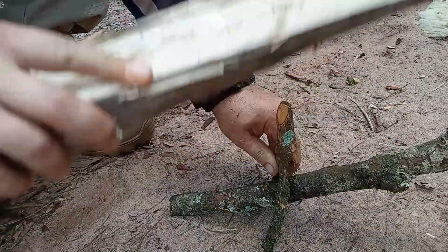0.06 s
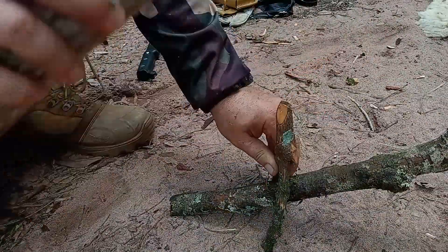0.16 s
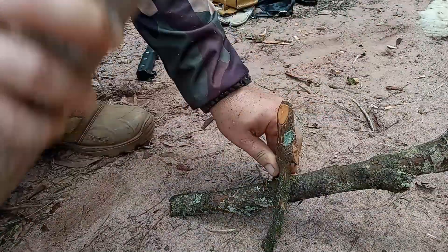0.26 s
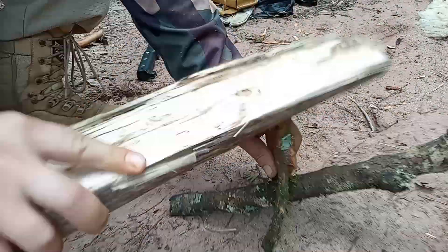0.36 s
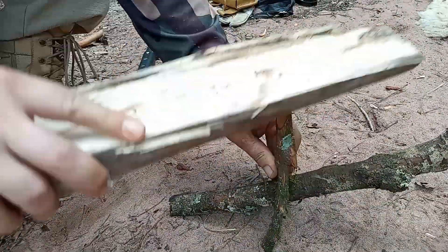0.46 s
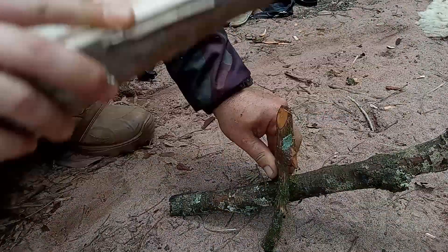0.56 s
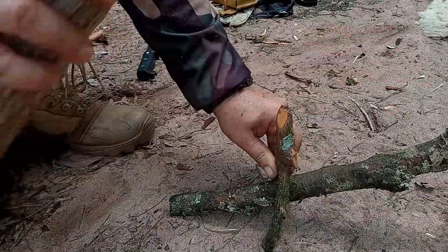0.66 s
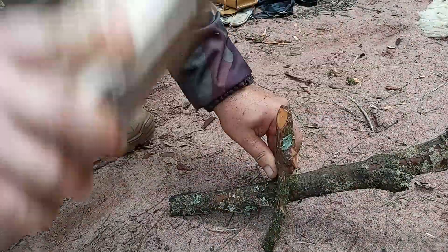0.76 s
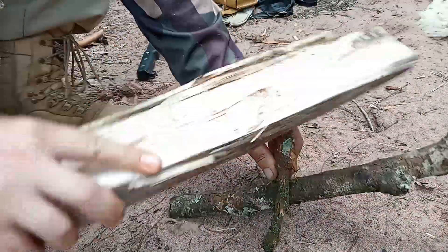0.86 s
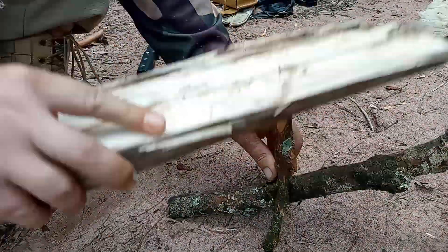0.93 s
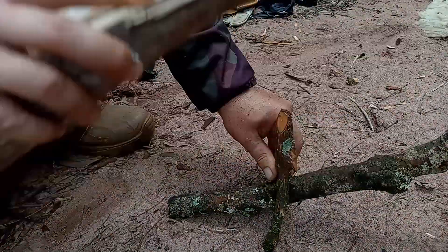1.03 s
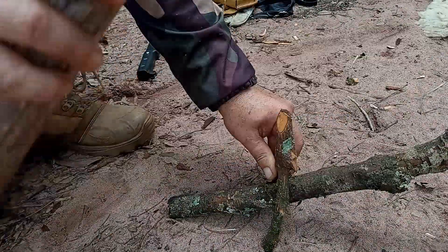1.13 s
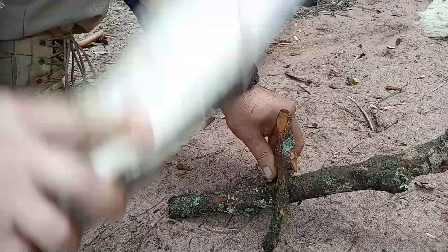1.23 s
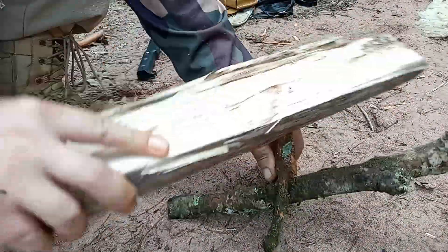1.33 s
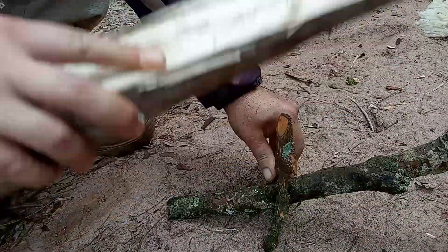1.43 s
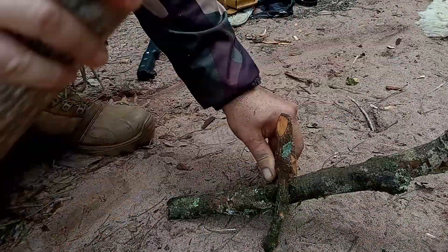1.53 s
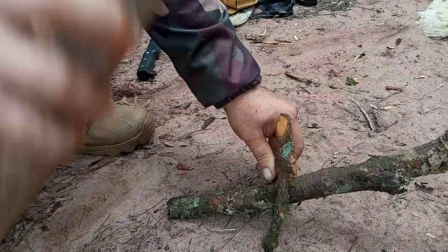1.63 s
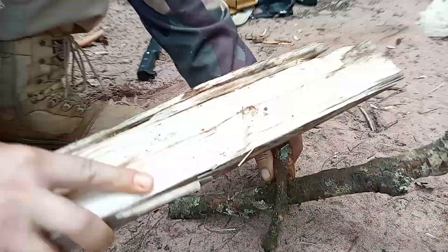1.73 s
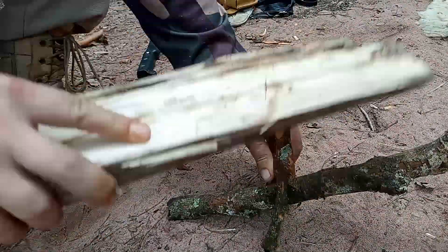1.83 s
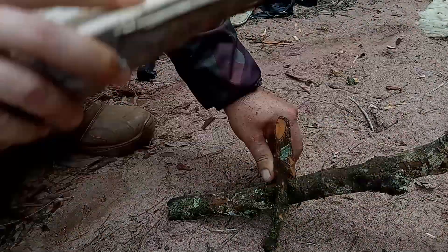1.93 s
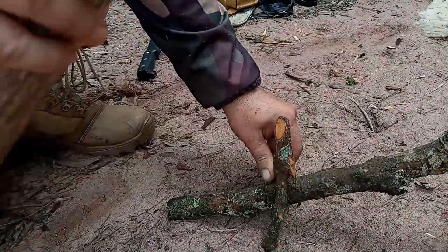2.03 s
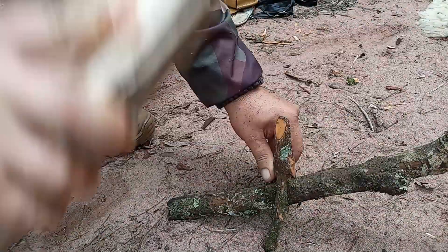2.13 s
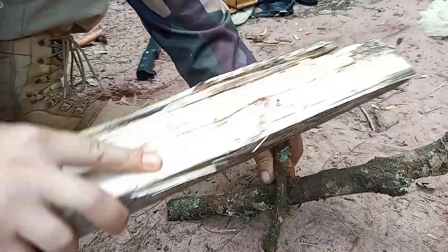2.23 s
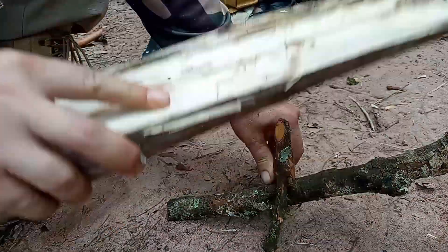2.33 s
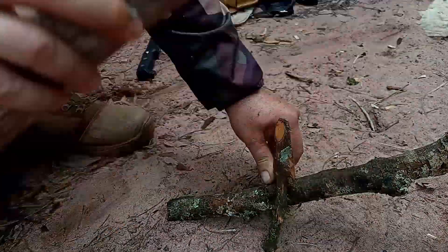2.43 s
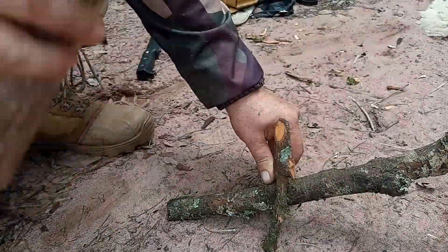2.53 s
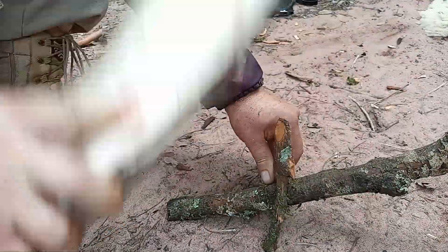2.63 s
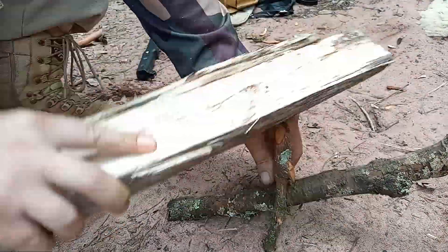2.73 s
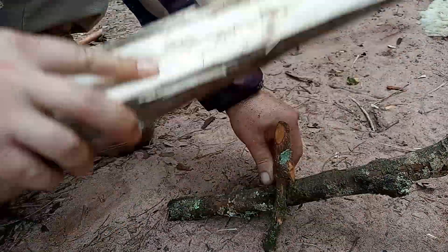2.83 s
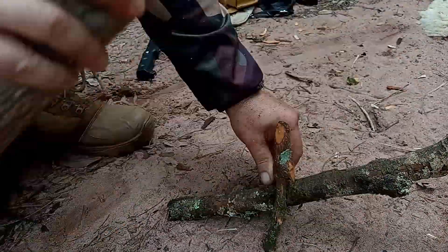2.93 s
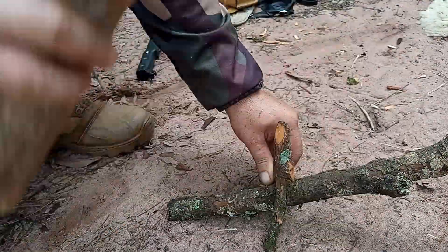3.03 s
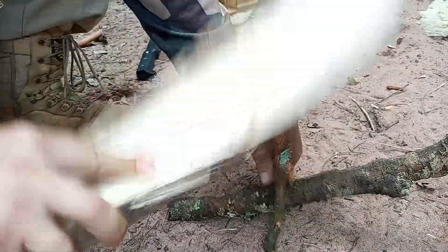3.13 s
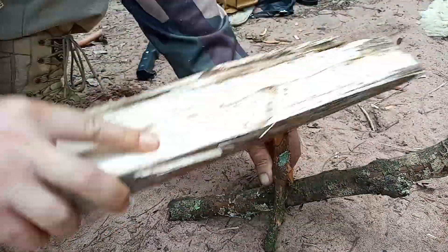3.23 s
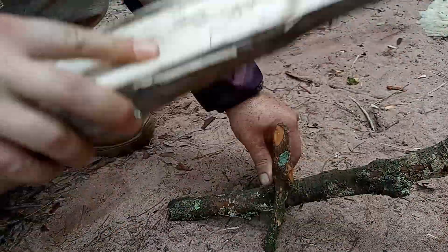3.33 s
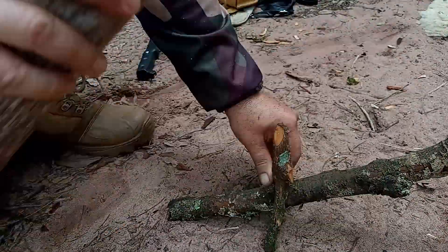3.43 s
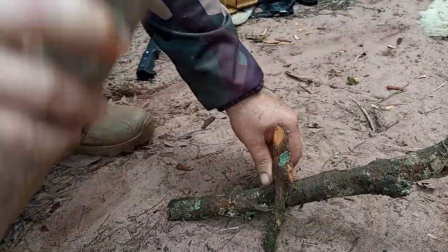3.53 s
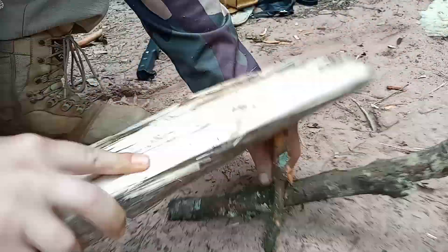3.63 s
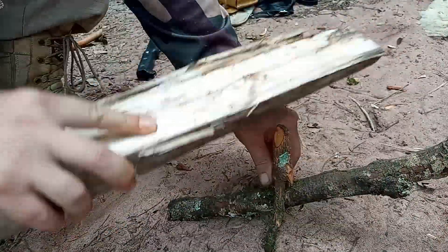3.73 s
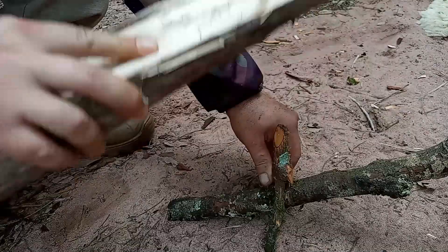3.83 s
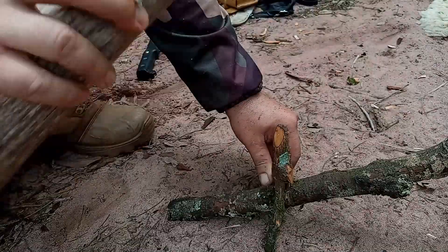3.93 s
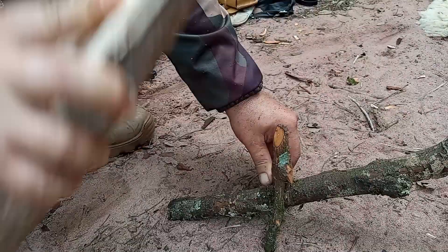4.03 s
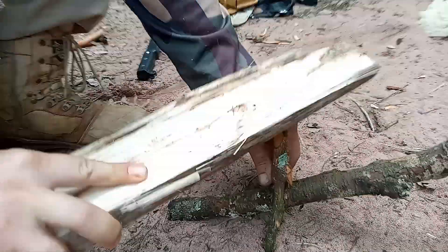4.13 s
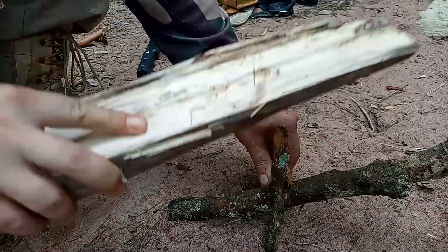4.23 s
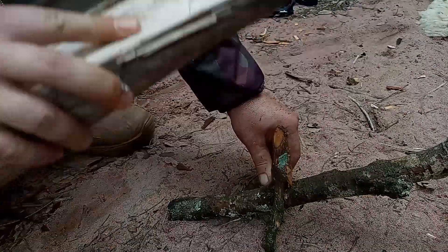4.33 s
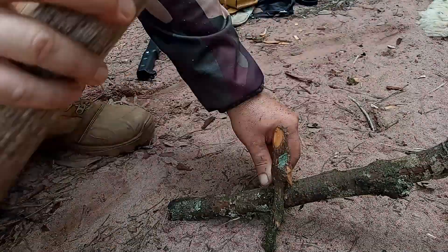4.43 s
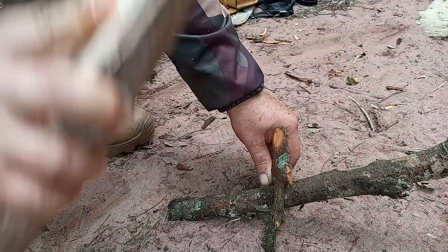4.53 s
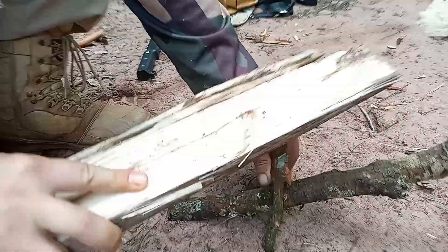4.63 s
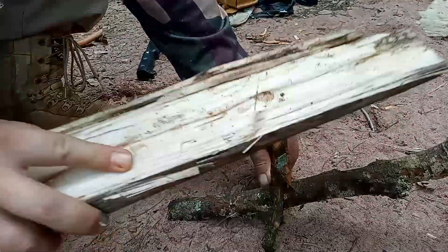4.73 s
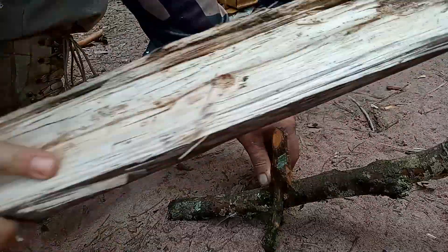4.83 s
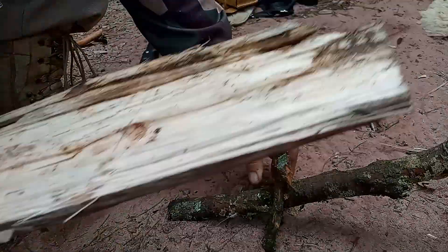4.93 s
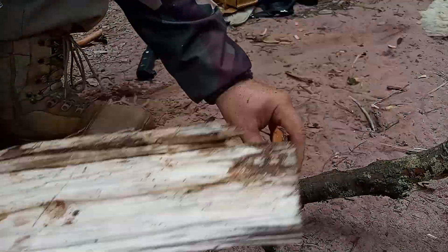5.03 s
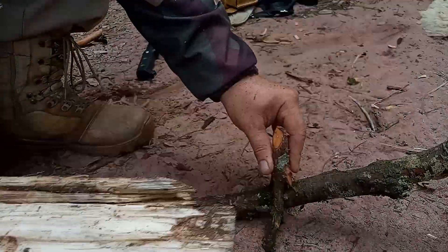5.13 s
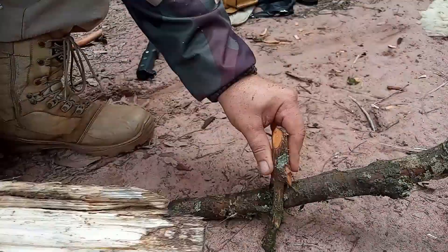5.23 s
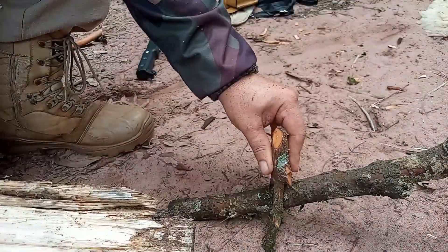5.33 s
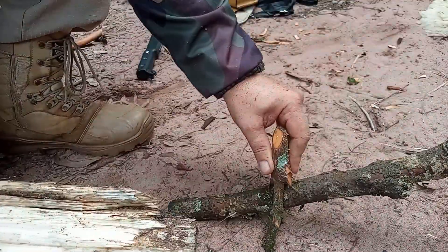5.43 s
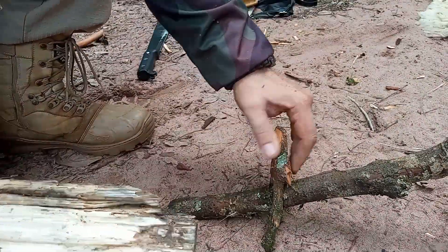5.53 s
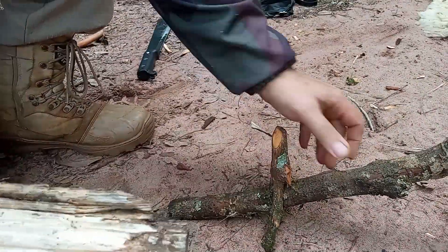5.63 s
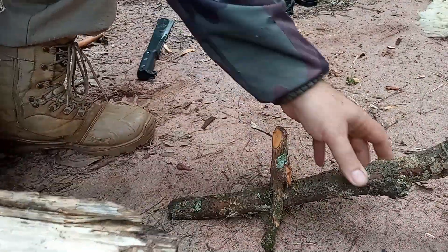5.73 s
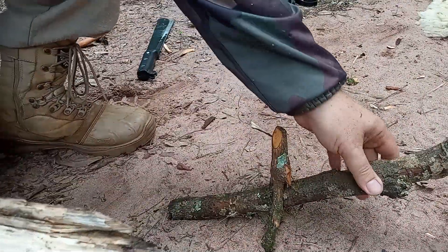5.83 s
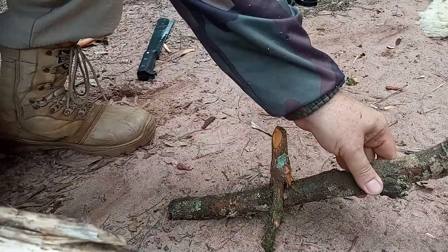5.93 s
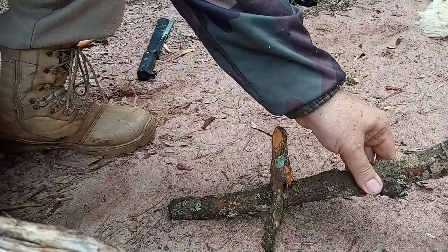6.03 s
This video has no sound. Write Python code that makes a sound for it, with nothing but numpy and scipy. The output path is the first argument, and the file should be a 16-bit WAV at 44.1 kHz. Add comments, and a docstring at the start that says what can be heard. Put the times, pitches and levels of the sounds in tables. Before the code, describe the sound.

Ten close, steady wood-on-wood knocks drive a stake into soil in quiet woods, followed by soft handling noises.

```python
"""Driving a stake in the woods

A split log knocks a thin wooden stake into sandy ground, ten blows close to a pair of microphones.
Each blow rings the log and the stake, thuds into the soil and throws up sand that rains back down.
The log clicks on the stake, sleeves rustle, grit ticks. Behind lie the hush of the woods, the faint wing
drone of an insect and the microphones' own hiss. The recorder's gain control ducks the loud moments."""
import sys
import numpy as np
from scipy import signal
from scipy.fft import rfft, irfft, next_fast_len
from scipy.io import wavfile
from scipy.ndimage import uniform_filter1d, minimum_filter1d, map_coordinates

SR = 44100
rng = np.random.default_rng(int(sys.argv[2]) if len(sys.argv) > 2 else 0)


def log_audio(samples):
    """Write samples as a 16-bit WAV file to the path given in sys.argv[1]."""
    # one column per channel
    frames = np.atleast_2d(samples).T
    # limit to full scale, then quantise
    limited = np.clip(frames, -1, 1)
    pcm = np.round(limited * 32767).astype(np.int16)
    wavfile.write(sys.argv[1], SR, pcm)


N = 267687
LEFT_LAG_S = .00096  # the stake stands nearer the right microphone


def amp(db):
    """Decibels to gain."""
    return 10 ** (np.asarray(db) / 20)


def unit(x):
    """x scaled to rms 1."""
    return x / np.sqrt(np.mean(x ** 2) + 1e-20)


def along(points, hz, column=1):
    """One column of (Hz, value, ..) rows, interpolated on a log frequency axis."""
    rows = np.array(points)
    return np.interp(np.log(hz + 1), np.log(rows[:, 0] + 1), rows[:, column])


def wobble(rate):
    """A smooth random curve with `rate` knots a second."""
    return map_coordinates(rng.standard_normal(int(N * rate / SR) + 4), [np.arange(N) * rate / SR])


def filtered(x, response):
    """x through a gain given as a function of frequency."""
    n = x.shape[-1]
    padded = next_fast_len(n + 2048)
    return irfft(rfft(x, padded) * response(np.fft.rfftfreq(padded, 1 / SR)), padded)[..., :n]


def band(hz, centre_hz, octaves):
    """Bell-shaped gain on a log frequency axis."""
    return np.exp(-.5 * (np.log2((hz + 1) / centre_hz) / octaves) ** 2)


def swell(peak_s, rise_s, fall_s):
    """Rises as a bell to its peak, then fades exponentially."""
    t = np.arange(N) / SR - peak_s
    return np.where(t < 0, np.exp(-(t / rise_s) ** 2), np.exp(-np.abs(t) / fall_s))


def ring(modes, t, pitch, spread=.0091):
    """Dying sines; grip and point of contact shift each one a little from strike to strike."""
    return sum(amp(db + rng.normal(0, 2) - 60 * t / t60)
               * np.sin(2 * np.pi * hz * pitch * rng.normal(1, spread) * t) for hz, db, t60 in modes)


def place(out, sound, start_s, pan_db):
    """Adds a near sound, right microphone first; pan_db is left over right."""
    for channel, (side, lag_s) in enumerate([(.5, LEFT_LAG_S), (-.5, 0)]):
        at = round((start_s + lag_s) * SR)
        arriving = sound[channel] if sound.ndim == 2 else sound
        out[channel, at:at + len(arriving)] += amp(side * pan_db) * arriving


def at_both_mics(sound, left_db, right_db):
    """One continuous sound at both microphones, a little later on the left."""
    return np.array([amp(left_db) * np.roll(sound, round(LEFT_LAG_S * SR)), amp(right_db) * sound])


# Treble colour of the microphone ports. Each row: frequency in Hz, gain in dB.
PORT_COLOUR = [(1760, -38), (3000, -13.5), (3270, -17), (3780, -10), (4160, -9.5), (6570, 2), (8910, -7.5),
               (10400, -3), (13400, -16.5), (15100, -7.5), (16000, -8.5), (17000, -32)]
def port_gain(hz):
    """The peaks and dips that the ports put on the treble."""
    return amp(along(PORT_COLOUR, hz))


# How hush, hiss and rustle lean across the pair. Each row: frequency in Hz, left over right in dB.
NOISE_BALANCE = [(60, -1), (99, 1.5), (160, 7.5), (270, -2), (450, -2.5), (740, 2), (1220, 4), (2010, 5.5),
                 (3330, 5), (5500, 6), (9080, 3.5), (15000, -12.5)]
def balance(hz, points=NOISE_BALANCE):
    """Gains of the left and right microphone at each frequency."""
    return amp(np.outer([.5, -.5], along(points, hz)))


def noise_bed(spectrum, db, waver_db, waver_hz):
    """Nearly steady noise, unrelated in the two channels."""
    gain = amp(db + waver_db * wobble(waver_hz))
    noise = rng.standard_normal((2, N))
    return gain * unit(filtered(noise, lambda hz: amp(along(spectrum, hz)) * balance(hz) * (hz < 16000)))


# Steady high hiss of the microphones. Each row: frequency in Hz, relative noise density in dB.
MIC_HISS_SPECTRUM = [(3240, -42), (5500, -15), (6040, -15), (6770, -7.5), (8210, -5), (9290, -23),
                     (10600, -2.5), (12400, -24), (15100, -12.5), (17000, -38.5)]
def mic_hiss():
    """The microphones' self-noise."""
    return noise_bed(MIC_HISS_SPECTRUM, db=-67.5, waver_db=.4, waver_hz=1.6)


# The woods all around. Each row: frequency in Hz, relative noise density in dB.
HUSH_SPECTRUM = [(24, 21), (45, 8), (90, -3.5), (173, -5.5), (261, -1), (355, -9.5), (402, -5.5),
                 (607, -4.5), (879, -9.5), (1470, -6.5), (5500, -15), (7150, -47.5), (12100, -120)]
def woods():
    """A low, even hush."""
    return noise_bed(HUSH_SPECTRUM, db=-63.5, waver_db=.55, waver_hz=1)


# An insect in the background. Each row: multiple of the wing beat, relative level in dB,
# group (0 low, 1 high).
WING_HARMONICS = [(1, -12, 0), (2, -4, 0), (3, 0, 0), (7, -11, 1), (8, -6, 1), (9, -1.5, 1), (10, -9, 1)]
# Its drone comes and goes. Each row: time in seconds, levels of the low and the high group in dB.
DRONE_LEVELS = [(0, -67, -62.5), (.12, -78, -83.5), (.45, -79, -89), (.58, -75, -83.5), (.72, -69.5, -68),
                (.95, -72, -94), (1.1, -81, -87.5), (1.37, -79.5, -67.5), (1.48, -81.5, -79.5),
                (1.6, -76.5, -69), (1.85, -84, -76), (2.2, -84.5, -90), (2.5, -80.5, -90),
                (3.3, -85.5, -88.5), (3.7, -91.5, -90), (4.0, -83.5, -87.5), (4.5, -88, -96.5),
                (4.88, -79, -81), (5.2, -82, -101), (6.07, -85, -96)]
def insect(wing_hz=200.9):
    """Harmonics of the wing beat; the low ones waver, the high ones flutter into a blur."""
    times, *groups = np.transpose(DRONE_LEVELS)
    group_db = [np.interp(np.arange(N) / SR, times, levels) for levels in groups]
    phase = 2 * np.pi * np.cumsum(wing_hz * (1 + .016 * wobble(32))) / SR
    drone = np.zeros(N)
    for multiple, db, group in WING_HARMONICS:
        flutter = unit(wobble(170 if group else 22))
        drone += amp(db + group_db[group]) * flutter * np.sin(multiple * phase)
    return at_both_mics(drone, left_db=9.5, right_db=1.5)


# Soft bumps in the soil nearby. Each row: peak time in seconds, level in dB.
SOIL_BUMPS = [(0.2, -66.5), (0.84, -39), (1.64, -54), (5.96, -72.5)]
def soil_rumble(fade_s=.11):
    """Low noise from the ground, after each blow and at each soft bump."""
    t = np.arange(N) / SR
    after_blows = sum(amp(db + thud_db - 24) * np.exp(-((t - s) / fade_s) ** 2) * (t > s + .02)
                      for s, db, thud_db, *_ in LOG_BLOWS)
    bumps = sum(amp(db) * swell(s, rise_s=.012, fall_s=.024) for s, db in SOIL_BUMPS)
    colour = lambda hz: band(hz, 130, .34) + .44 * band(hz, 70, .5) + .23 * band(hz, 350, .61)
    soil = unit(filtered(rng.standard_normal(N), colour))
    return (after_blows + bumps) * at_both_mics(soil, left_db=4.5, right_db=.9)


# Sleeves brushing near the microphones. Each row: peak time in seconds, levels of rasp, hiss and
# swish in dB, time to rise and to fall in seconds.
SLEEVE_BRUSHES = [(0.01, -61.5, -65, -60.5, 0.066), (0.1, -61.5, -68.5, -79, .03),
                  (0.201, -64.5, -66.5, -90, .04), (0.59, -70, -66, -74, .04), (0.72, -63, -66, -65, .03),
                  (1.144, -71.5, -62.5, -73, 0.04), (1.402, -71.5, -74.5, -79.5, 0.033),
                  (1.595, -62.5, -60, -70, 0.036), (1.655, -67, -72.5, -52.5, .012),
                  (1.938, -58.5, -62.5, -81, .03), (2.337, -69, -72.5, -92, .04),
                  (2.814, -63, -69.5, -82.5, 0.018), (2.972, -69.5, -69.5, -74, 0.018),
                  (3.288, -72, -64, -91, 0.027), (3.775, -72.5, -73, -84, .03),
                  (3.863, -77, -67.5, -93.5, 0.026), (4.286, -67.5, -74, -88, .04),
                  (4.362, -70, -66, -90, 0.022), (5.076, -70.5, -74.5, -86, .05),
                  (5.182, -63, -64, -74, 0.019), (5.428, -82.5, -61, -84, .012),
                  (5.678, -65.5, -66.5, -74, .04), (5.749, -73, -69, -84, .04),
                  (5.854, -80.5, -64, -86, .012)]
def rustle_gains():
    """Gains of rasp, hiss and swish as sleeves brush and thrown sand rains down after each blow."""
    t = np.arange(N) / SR
    sand = sum(amp(sand_db) * (t > s) * swell(s + .09, rise_s=.15, fall_s=.05)
               for s, *_, sand_db in LOG_BLOWS)
    cloth = sum(amp(levels_db)[:, None] * swell(s, half_s, half_s)
                for s, *levels_db, half_s in SLEEVE_BRUSHES)
    return cloth + amp([[0], [-3], [-5]]) * sand  # sand is mostly rasp


def rustle():
    """Cloth and sand: three bands of noise broken into grains of uneven size."""
    rasp_gain, hiss_gain, swish_gain = rustle_gains()
    grains = unit(amp(.5 * wobble(300) + .67 * wobble(45)))
    def layer(colour):
        return unit(filtered(grains * rng.standard_normal((2, N)), lambda hz: colour(hz) * balance(hz)))
    rasp = layer(lambda hz: port_gain(hz) * band(hz, 6100, 1))
    hiss = layer(lambda hz: port_gain(hz) * (hz > 9000) * (hz < 16000))
    swish = layer(lambda hz: band(hz, 1600, 1))
    return rasp_gain * rasp + hiss_gain * hiss + swish_gain * swish


def fine_grit(count=140):
    """Rows for clicks(): small grains that fall more often and louder while cloth and sand move."""
    rasp_gain, hiss_gain, _ = rustle_gains()
    activity = rasp_gain + hiss_gain + amp(-68.5)
    when, size, side, pitch = rng.random((count, 4)).T
    at = np.minimum(np.searchsorted(np.cumsum(activity), when * activity.sum()), N - 1)
    activity_db = 20 * np.log10(activity[at] / np.median(activity))
    level_db = -56 + .6 * activity_db + 9 * size ** 2
    return zip(at / SR + .001, level_db, 24 * (side - .5), 6000 * 2.6 ** pitch)


# Sharp close clicks: the log tapping or rebounding on the stake, and ticks of grit. Each row: start in
# seconds, level in dB, left over right in dB, centre frequency in Hz.
CLOSE_CLICKS = [(0.0578, -31.5, 22, 15300), (0.0288, -42.5, 4, 7300), (0.0974, -41, 5, 9000),
                (0.1324, -27.5, -11, 9650), (0.3022, -43, 4, 6700), (0.3243, -4.5, 11, 7530),
                (0.3262, -9.5, 4.5, 12700), (0.379, -27.5, 1, 5700), (0.405, -30, -8, 15200),
                (0.421, -35, -3, 5700), (0.438, -37, 4, 7210), (0.4574, -38, 2, 7800),
                (0.566, -38, -10, 10200), (0.7292, -24, 14.5, 7100), (0.7797, -4.5, 7.5, 7800),
                (0.8647, -31, 4, 6160), (0.8856, -33, -10, 14500), (0.9216, -46, -4, 10100),
                (0.9307, -33.5, -9, 15500), (0.998, -47, 10, 7490), (1.1545, -42, -6, 10500),
                (1.262, -40.5, 3, 6700), (1.3056, -28, -5, 15300), (1.3104, -23.5, 5, 5940),
                (1.3347, -33.5, 1, 14500), (1.36, -42, -7, 15500), (1.558, -45.5, 3, 7900),
                (1.59, -46.5, 6, 7600), (1.712, -43, 5, 6430), (1.7512, -22.5, -1, 5900),
                (1.812, -47, -10, 15600), (1.8392, -43.5, 7, 8250), (1.859, -42.5, -4, 10500),
                (1.922, -20.5, 14, 6300), (1.9482, -37.5, 17, 7140), (2.217, -40, -10, 11230),
                (2.5947, -20, 0.5, 3400), (2.5962, -14.5, 4, 2900), (2.6914, -35, 4, 7200),
                (2.7142, -35, -2, 7740), (2.8145, -45, 23.5, 7700), (2.966, -34.5, -16, 15400),
                (3.2844, -50, -10.5, 15430), (3.6638, -13.5, -4, 15400), (3.717, -47, -7, 10500),
                (3.851, -47, 0, 10500), (4.166, -44, -7, 12500), (4.2687, -47, 13.5, 6025),
                (4.351, -48, -21, 10640), (4.667, -35.5, -1.5, 7660), (4.6787, -28.5, -3, 14450),
                (4.8063, -44.5, 15, 7650), (4.8763, -43.5, 9, 7800), (5.02, -49, 9.5, 5800),
                (5.068, -52, 8, 7200), (5.0868, -48, 8, 6670), (5.1718, -16.5, 13.5, 15040),
                (5.414, -43.5, -5, 10700), (5.657, -37.5, -3, 5880), (5.7187, -44, -7, 15400),
                (5.8526, -51, -16, 10400), (5.866, -50, -11, 15000), (5.8855, -49, -9, 10120)]
def clicks(t60_s=.0083, wash_t60_s=.029):
    """Each brief contact gives a burst of noise around its own pitch, with a faint wash after it."""
    out, t = np.zeros((2, N + SR)), np.arange(SR // 10) / SR
    envelope = (1 - np.exp(-t / .0003)) * (amp(-60 * t / t60_s) + amp(-20 - 60 * t / wash_t60_s))
    for start_s, db, pan_db, centre_hz in [*CLOSE_CLICKS, *fine_grit()]:
        octaves = .11 * max(7000 / centre_hz, 1) ** 2.6  # lower clicks sound broader
        def colour(hz):
            peak = band(hz, centre_hz, octaves) + .53 * band(hz, centre_hz, .99)
            return peak * port_gain(np.maximum(hz, 3500)) ** .4
        burst = unit(filtered(rng.standard_normal(len(t)), colour))
        place(out, amp(db - 1) * envelope * burst, start_s - .0004, pan_db)
    return out[:, :N]


# A dry twig. Each row: frequency in Hz, relative level in dB, time to fall 60 dB in seconds.
TWIG_MODES = [(2270, 0, 0.028), (3280, -12, 0.014)]
# Its faint snaps nearby. Each row: start in seconds, level in dB, left over right in dB.
TWIG_SNAPS = [(5.655, -58, 1), (5.6699, -63, 4)]
def twig():
    """A dry twig rings briefly each time it snaps."""
    out, t = np.zeros((2, N + SR)), np.arange(SR // 10) / SR
    for start_s, db, pan_db in TWIG_SNAPS:
        place(out, amp(db + 3.5) * ring(TWIG_MODES, t, pitch=1), start_s, pan_db)
    return out[:, :N]


# Ground and trees around the stake answer a blow. Each row: frequency in Hz, relative level in dB,
# time to fall 60 dB in seconds.
ECHO_SPECTRUM = [(59.6, -32, 0.16), (140, -19.5, 0.23), (296.9, -15.5, 0.11), (720, -25, 0.13),
                 (1170, -33, 0.09), (1570, -27, 0.13), (2220, -32.5, .1), (4000, -37.5, 0.12),
                 (12000, -43, 0.089)]
def woodland_echo(t):
    """Scattered sound: stereo noise in which each frequency dies at its own speed."""
    noise = rng.standard_normal((2, len(t)))
    hz, frame_s, spectra = signal.stft(noise, SR, nperseg=512, noverlap=448)
    spectra[1] = np.where(hz[:, None] < 450, spectra[0], spectra[1])  # both microphones share the bass
    t60_s = along(ECHO_SPECTRUM, hz, column=2)[:, None]
    fade_db = along(ECHO_SPECTRUM, hz)[:, None] - 60 * frame_s / t60_s
    _, echo = signal.istft(spectra * amp(fade_db), SR, nperseg=512, noverlap=448)
    return (1 - np.exp(-t / .002)) * echo[:, :len(t)]


# The crack and its grit across the pair. Each row: frequency in Hz, left over right in dB.
CRACK_BALANCE = [(1000, 13.5), (6000, -0.5), (9000, 3), (15000, -10)]
def crack(t, crack_db, sinking, blow_index):
    """Fibres crush at contact, then bark and grit chatter until the stake stops sinking."""
    crush = amp(crack_db + 3 - 60 * t / .013)
    roughness = amp(4.5 * wobble(500)[:len(t)])
    chatter = amp(-29.5 - 60 * t / .25) * roughness * sinking
    top_db = 1 - .23 * blow_index  # the top treble dulls as the fibres flatten
    def colour(hz):
        body = band(hz, 1500, 1) + .5 * port_gain(hz)
        return body * balance(hz, CRACK_BALANCE) * amp(top_db * (hz > 9000))
    common, left, right = rng.standard_normal((3, len(t)))
    return (crush + chatter) * unit(filtered(common + 6.6 * np.array([left, right]), colour))


# What rings at a blow. Each row: frequency in Hz before the blow's pitch factor, relative level in dB,
# time to fall 60 dB in seconds.
THUD_MODES = [(81, -38, 0.022), (163.7, 3.5, 0.064), (134, -31, 0.38)]  # the stake bouncing in the soil
STAKE_MODES = [(359, 3, 0.023), (380, -5, 0.0083)]  # the stake bending
KNOCK_MODES = [(490, 6.5, 0.0099), (608, 4, 0.016)]  # the log's lowest modes
TOCK_MODES = [(757, -0.5, 0.024), (840, -8.5, 0.036)]  # its middle modes
CLACK_MODES = [(1250, -7, .008), (1640, -1, .02), (2000, -2, .011), (2530, -4, .011), (3200, -2, .008)]  # its highest modes
# Ten blows, close to the microphones. Each row: start in seconds, level in dB, trims of thud, stake,
# tock, clack and crack in dB, left over right in dB, pitch factor of the log, level of the sand in dB.
LOG_BLOWS = [(0.317, -17.5, -12.5, -22, -9.5, -21.5, -14.5, 4.5, 1.063, -54.5),
             (0.77, -17, -10.5, -5, -4, -13, -8.5, 3.5, 0.99, -51),
             (1.211, -18, -10.5, -7.5, 1.5, -10, -17, 2, 1.05, -54),
             (1.665, -14, -11.5, -11, -2.5, -25, -14.5, 2.5, 0.92, -53),
             (2.139, -11, -13, -7.5, -14.5, -26, -9, 2, 0.98, -62.5),
             (2.617, -15.5, -10, -11, -7, -6, -9.5, 2, 1.03, -59),
             (3.099, -12, -11, -9, -2.5, -17, -12, 0.5, 1.01, -63.5),
             (3.582, -13, -10, -10, -10.5, -14.5, -9, 2, 0.99, -61.5),
             (4.063, -14.5, -9, -11, -8.5, -9.5, -12, 2.5, 1.05, -61),
             (4.56, -5.5, -17.5, -14.5, -3, -9, -17.5, -1, 1.08, -60)]
def blows():
    """The log lands on the stake: log, stake and soil ring together and the woods answer."""
    out, t = np.zeros((2, N + SR)), np.arange(SR // 2) / SR
    facing = amp([[2.2], [-2.2]])  # shorter waves favour the left microphone, which faces the log
    landing = 1 - np.exp(-t / .0005)
    sinking = np.exp(-(t / .017) ** 5)  # the stake slides for a moment, then the soil grips it
    for index, blow in enumerate(LOG_BLOWS):
        start_s, db, thud_db, stake_db, tock_db, clack_db, crack_db, pan_db, log_pitch, _ = blow
        ground_pitch = .92 + .007 * index  # rises as the stake goes deeper
        tock = amp(tock_db - 10) * ring(TOCK_MODES, t, log_pitch, spread=.058)
        clack = amp(clack_db + 1) * ring(CLACK_MODES, t, log_pitch, spread=.054)
        log = ring(KNOCK_MODES, t, log_pitch) + facing * (tock + clack)
        stake = amp(stake_db + 5) * ring(STAKE_MODES, t, ground_pitch)
        thud = amp(thud_db - 1) * (.27 + sinking) * facing ** -.4 * ring(THUD_MODES, t, ground_pitch)
        # the stake moves away as the log lands, so it starts in opposite sign
        impact = log - (stake + thud) + crack(t, crack_db, sinking, index)
        place(out, amp(db + 27.5) * landing * impact, start_s - .0001, pan_db + 1.2)
        place(out, amp(db + thud_db + 36) * woodland_echo(t), start_s, pan_db=2.5)
    return out[:, :N]


def scene():
    """Everything that reaches the two microphones, and their own hiss."""
    return blows() + clicks() + twig() + rustle() + soil_rumble() + woods() + mic_hiss() + insect()


def record(dry, threshold_db=-32, duck_share=.42, top_hz=16500):
    """The recorder: bass cut, look-ahead gain control, second bass cut, rounded peaks, band limit."""
    cut = signal.sosfilt(signal.butter(4, 66, "highpass", fs=SR, output="sos"), dry)
    excess_db = np.maximum(20 * np.log10(np.abs(cut).max(0) + 1e-9) - threshold_db, 0)
    ahead, hold, glide = round(.009 * SR), round(.004 * SR), round(.003 * SR)
    wanted_db = np.pad(-duck_share * excess_db, (hold, ahead))
    gain_db = minimum_filter1d(wanted_db, ahead + hold)[hold + (ahead - hold) // 2:][:N]
    ducked = cut * amp(uniform_filter1d(gain_db, glide))
    trimmed = signal.sosfilt(signal.butter(2, 62, "highpass", fs=SR, output="sos"), ducked)
    rounded = trimmed / (1 + np.abs(trimmed) ** 6) ** (1 / 6)
    return filtered(rounded, lambda hz: 1 / (1 + (hz / top_hz) ** 100))


dry = scene()
out = record(dry)
log_audio(out)
```